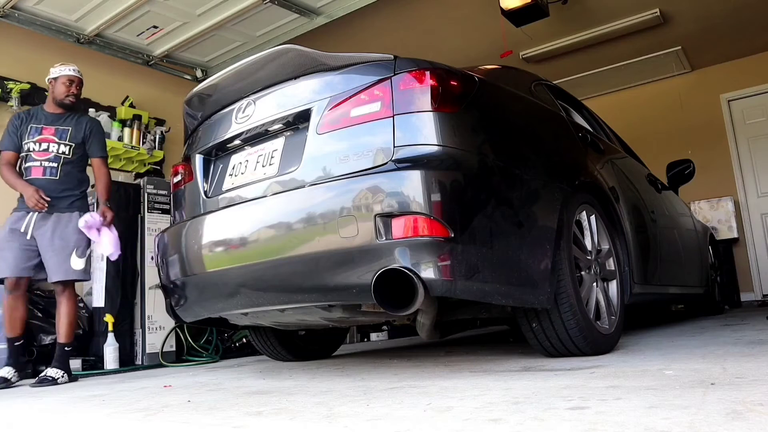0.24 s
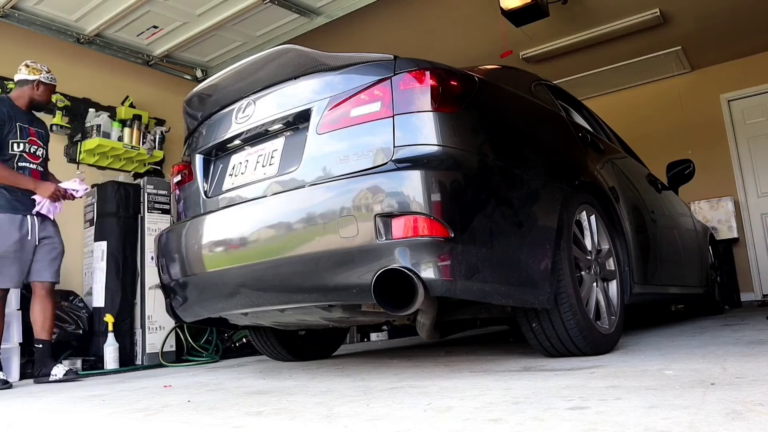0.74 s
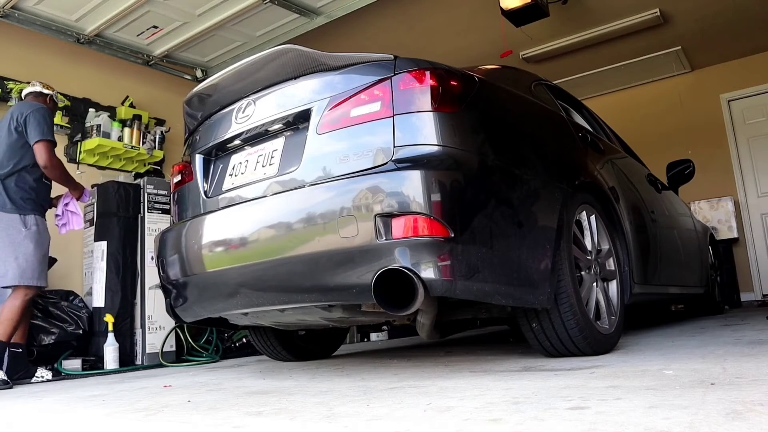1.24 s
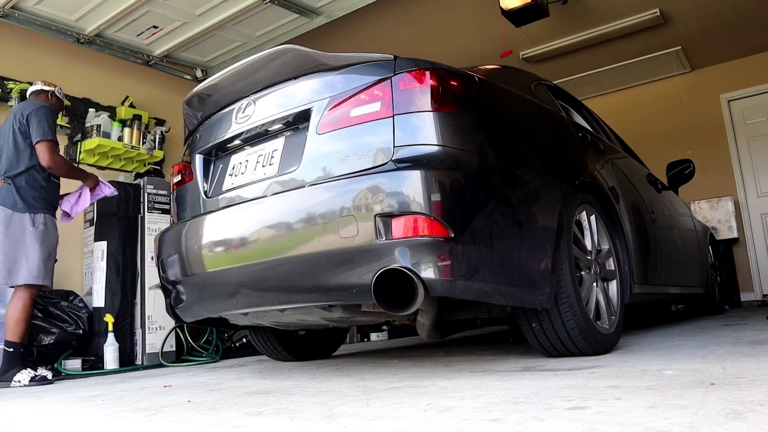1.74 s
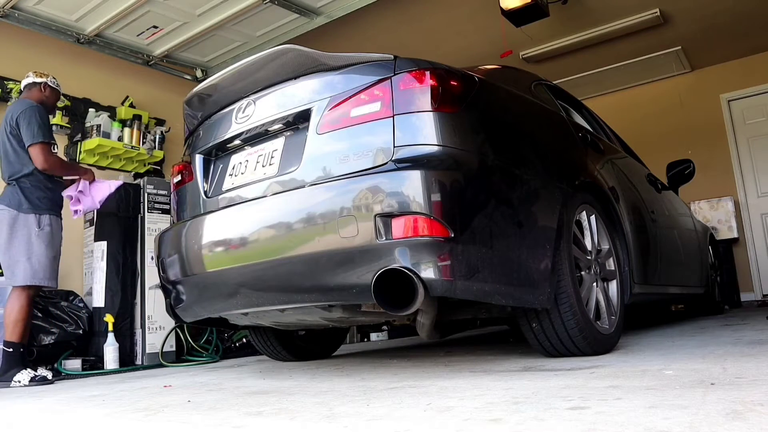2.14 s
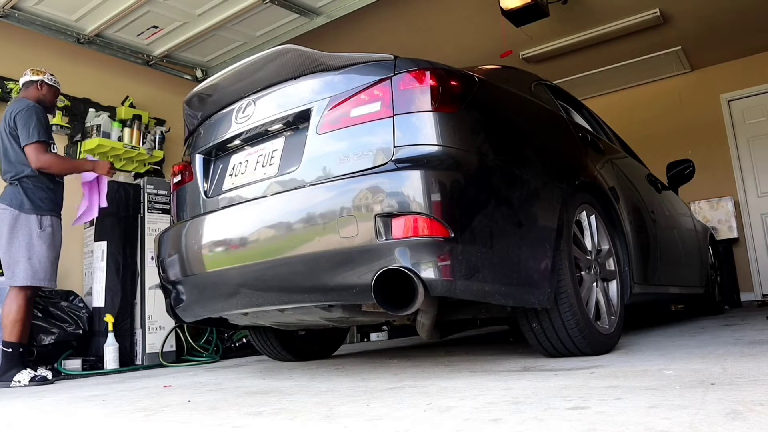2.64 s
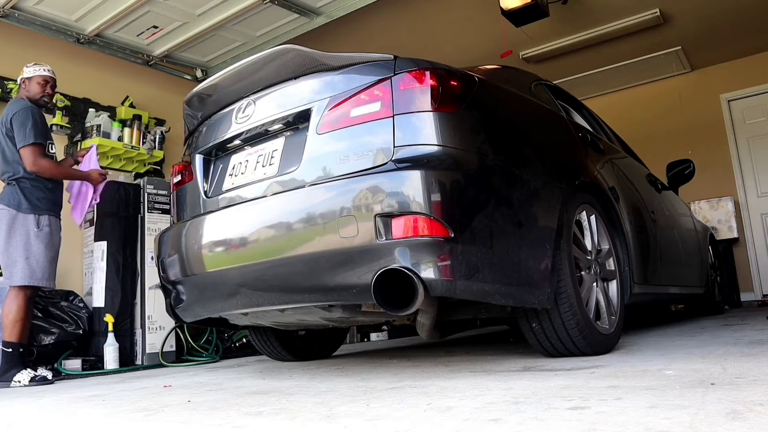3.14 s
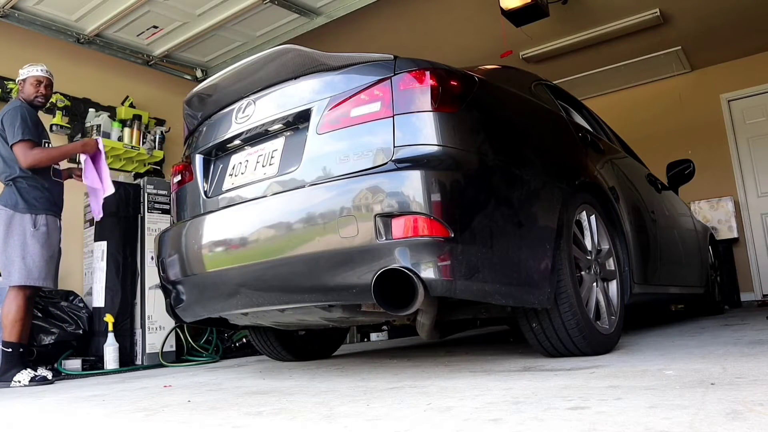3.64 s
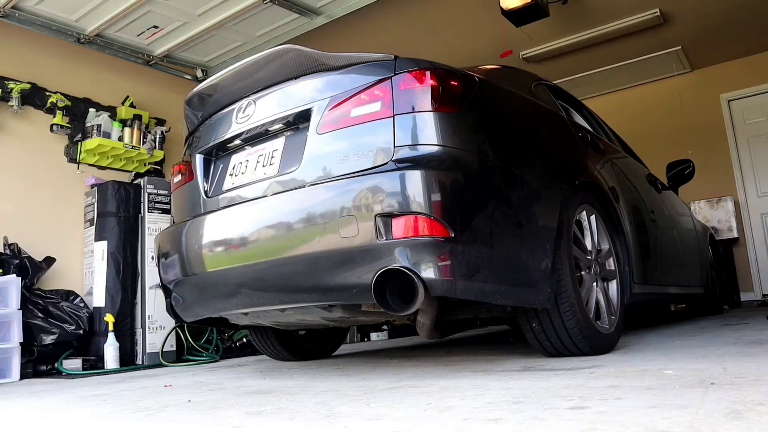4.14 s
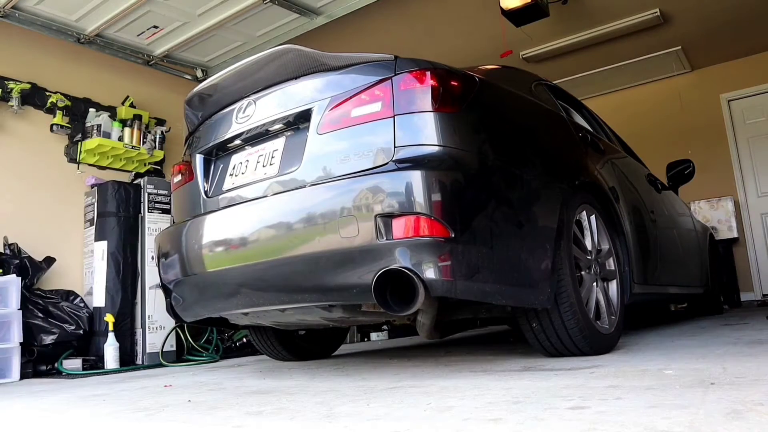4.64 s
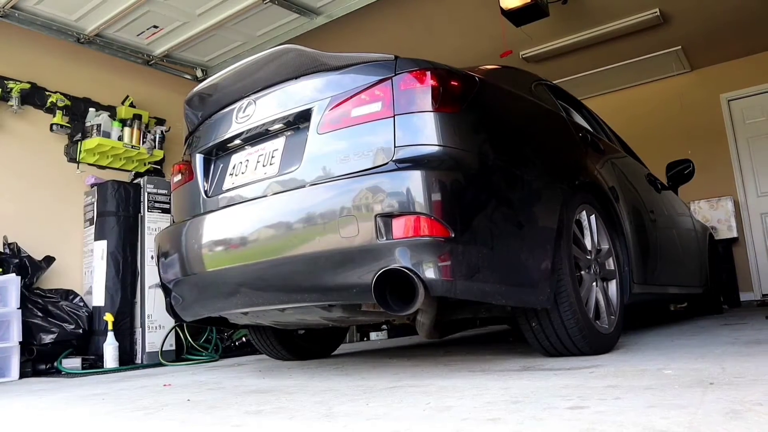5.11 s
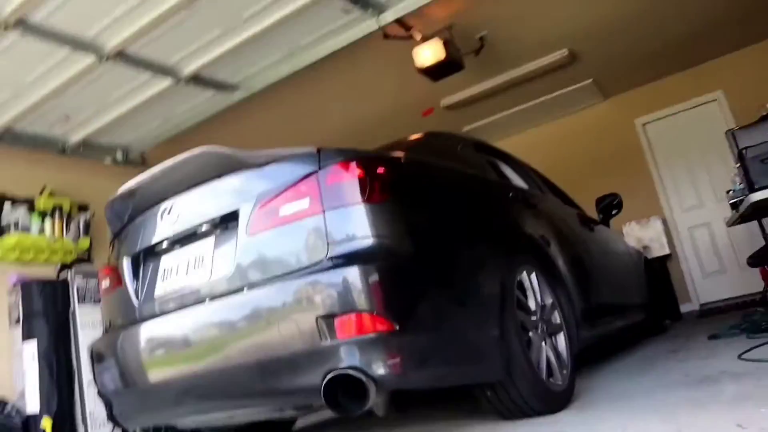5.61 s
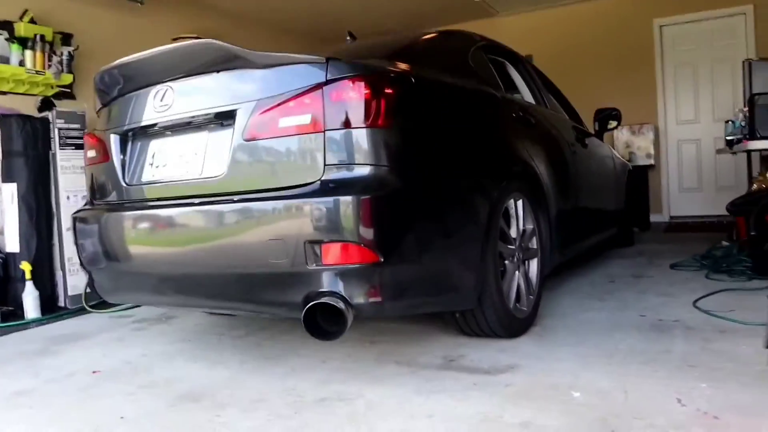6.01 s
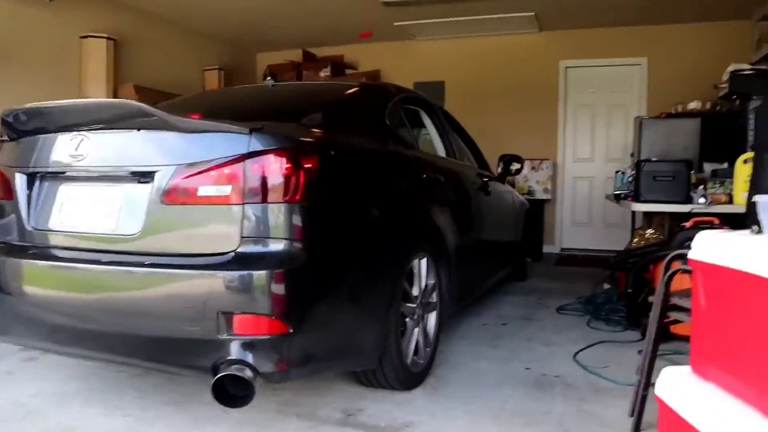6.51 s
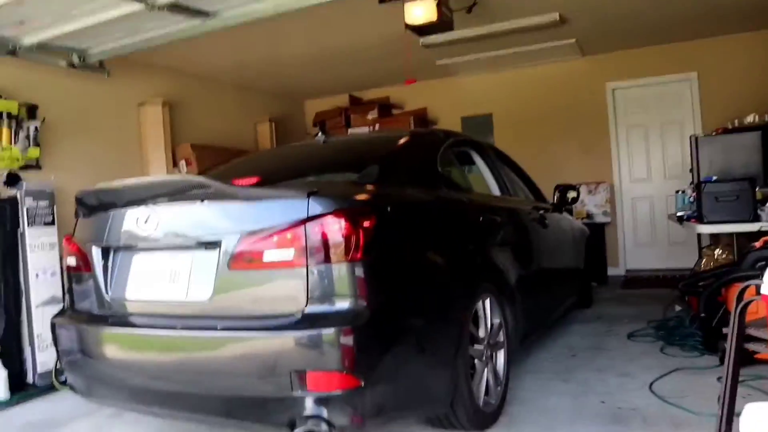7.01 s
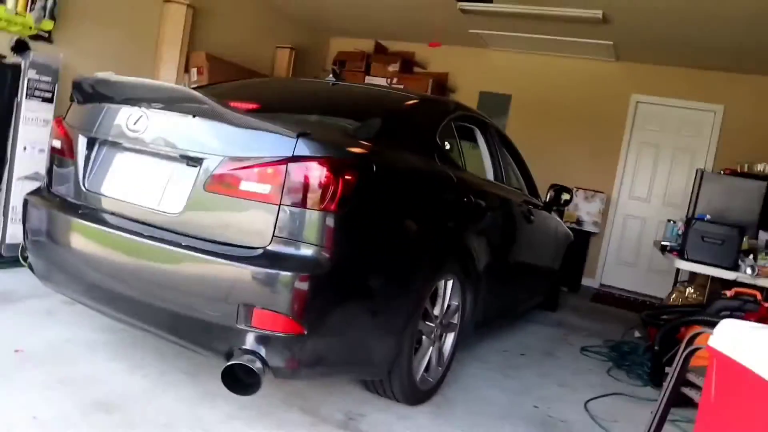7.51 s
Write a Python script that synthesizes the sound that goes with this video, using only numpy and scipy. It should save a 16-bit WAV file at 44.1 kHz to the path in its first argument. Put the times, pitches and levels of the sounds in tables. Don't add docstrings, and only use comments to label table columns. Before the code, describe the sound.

A car engine idles in a garage with a loud, lumpy exhaust drone and raspy gas puffs, cut briefly by silence, then continuing slightly lower.

```python
import sys
import numpy as np
from scipy import signal
from scipy.io import wavfile
from scipy.ndimage import uniform_filter1d

SR = 44100
rng = np.random.default_rng(int(sys.argv[2]) if len(sys.argv) > 2 else 0)


def gain_from_db(level_db):
    decades = np.asarray(level_db, float) / 20
    return 10 ** decades


def inscribe(sig):
    pcm = np.round(np.clip(np.atleast_2d(sig).T, -1, 1) * 32767)
    wavfile.write(sys.argv[1], SR, pcm.astype(np.int16))


N = 342216


def evened(x):
    return x / np.sqrt(np.mean(x ** 2) + 1e-20)


def curves(rows, t):
    s, *columns = np.transpose(rows)
    return [np.interp(t, s, column) for column in columns]


def read(points, hz):
    f, value = np.transpose(points)
    return np.interp(np.log(hz + 1), np.log(f + 1), value)


def resonate(x, hz, width):
    return signal.lfilter(*signal.iirpeak(hz, hz / width, SR), x)


# time_s, firing_rate_hz
SPEED_FIRST = [(0.0, 54.92), (0.25, 55.32), (1.28, 54.78), (1.81, 55.04), (2.27, 55.23), (2.49, 54.81),
               (3.99, 55.07), (4.2, 54.52)]
SPEED_SECOND = [(4.26, 53.71), (4.8, 53.0), (5.26, 53.34), (5.64, 54.39), (6.24, 53.74), (6.91, 53.78),
                (7.34, 53.36), (7.76, 53.51)]
FIRED = [9.104, 6.987]


def crank(t, k):
    speed = [SPEED_FIRST, SPEED_SECOND][k]
    turns = np.cumsum(curves(speed, t)[0]) / SR
    count = np.floor(FIRED[k] + turns - np.interp(speed[0][0], t, turns))
    at = np.flatnonzero(np.diff(count)) + 1
    cylinder = (count[at] % 6).astype(int)
    return at, cylinder, turns / 6


# time_s, change_db
ODD_FIRST = [(0.053, -12), (0.469, 7.5), (0.632, 2.5), (0.796, 5.1), (1.251, -2), (1.306, 8.5), (1.36, -5),
             (1.579, -4.6), (1.616, 2.5), (1.815, 4.5), (1.87, 3.5), (2.142, 2), (2.323, 5.5), (2.378, 3),
             (2.414, -27), (2.596, 2.5), (2.669, -10), (2.761, 6), (2.834, 5.0), (3.016, 7), (3.034, 3.8),
             (3.198, 8), (3.253, -4), (3.344, 6.5), (3.362, 4.0), (3.471, 5.5), (3.762, -2.5), (3.798, 4.3),
             (3.889, 5), (4.125, -9),
             (.162, 1.5), (.525, -4), (.561, -4), (.978, -3), (1.014, -2), (1.214, -1), (1.396, -3.5),
              (1.433, -4), (1.451, -3), (1.469, 3.5), (1.761, -1), (2.069, -4), (2.979, -3), (3.289, -5)]
ODD_SECOND = [(4.391, 2.5), (4.672, 4.5), (4.71, 2.5), (4.785, 2), (5.048, 2.5), (5.086, 3.5), (5.18, 2.8),
              (5.255, 5.0), (5.386, 4.5), (5.423, 7), (5.553, -1.5), (5.59, 5), (5.737, 2.5), (5.774, 3.2),
              (5.792, 2.5), (5.811, 3.5), (5.847, -4), (5.922, 5.5), (6.181, 4.5), (6.814, 4), (6.851, 4),
              (7.467, 4)]
# time_s, change_db
LAST_BURN = (8.4, 8.9)
SCATTER_DB = [1.53, 1.32]


def burns(firing_s, k):
    carry = 0.3
    odd_db = np.zeros(len(firing_s))
    for s, db in [ODD_FIRST, [*ODD_SECOND, LAST_BURN]][k]:
        odd_db[np.argmin(abs(firing_s - s))] += db
    chance_db = SCATTER_DB[k] * rng.standard_normal(len(firing_s)) * (odd_db == 0)
    return signal.lfilter([1], [1, -carry], odd_db) + chance_db


CYLINDER_DB = [
    [3.2, 0.93, -0.06, -3, -1.05, -2.65],
    [1.06, .1, 0.39, -1.46, -0.55, -2.1],
]
# time_s, mean_blow_db
EFFORT_FIRST = [(0.0, -10), (0.84, -10.9), (1.68, -9), (2.52, -8), (3.36, -12.5), (4.2, -9)]
EFFORT_SECOND = [(4.26, -9.5), (4.96, -7.5), (5.66, -12), (6.36, -11), (7.06, -9), (7.76, -8)]
PUFF_DB = [
    [(-10, -6.5, -6, -7, -13.5, -14), (-7, -8, -3, -8.5, -12, -11), (-9, -14, -16, -9.5, -8.5, -9.5),
     (-7, -9, -9, -3, -1, -8)],
    [(-9, -9.5, -11.5, -10.5, -10, -9.5), (-9.5, -4.5, -9, -16.5, -15, -9.5),
     (-9, -15.5, -13, -5, -10.5, -5), (-11, -10, -11, -8, -8, -15)],
]


def firings(t, k):
    at, cylinder, cycles = crank(t, k)
    burn_db = burns(t[at], k)
    effort_db = curves([EFFORT_FIRST, EFFORT_SECOND][k], t[at])[0]
    blows = np.zeros(len(t))
    puffs = np.zeros((len(PUFF_DB[k]), len(t)))
    blows[at] = gain_from_db(np.array(CYLINDER_DB[k])[cylinder] + effort_db + burn_db)
    puffs[:, at] = gain_from_db(np.array(PUFF_DB[k])[:, cylinder] + 0.75 * burn_db)
    return blows, puffs, cycles


# pitch_hz, level_db, t60_s, sign at the microphone
PIPE = [
    [(55.2, -30, 0.99, 1), (100, -21.5, 1, 1), (116, -10.5, 0.12, 1), (143.95, -10, 0.99, -1),
     (172.32, -4, 0.26, -1), (190.9, -2.5, 0.22, 1), (212, -39, 0.94, -1), (248.3, -14.5, 0.47, -1),
     (283.8, -11, 0.2, -1), (298.3, -10, 0.64, 1), (330.4, -38, 0.86, 1), (391.8, -38, 0.47, -1),
     (441, -30, 0.18, 1)],
    [(54.5, -42, 1, 1), (100.4, -13, 0.7, 1), (130, -4.5, 0.077, -1), (157.4, -26.5, 0.48, 1),
     (173.46, 1.8, 0.13, 1), (186.6, 0, 0.2, -1), (218.3, -49, 1, 1), (245, -16.5, 0.77, 1),
     (270.3, -27.5, 0.22, 1), (293.7, -15, 0.62, -1), (337.2, -17, 0.066, 1), (349.4, -20, 0.9, -1),
     (384.4, -31.5, 0.26, -1), (447, -59, 0.9, -1)],
]
PIPE_TOP_HZ = [470, 358]


def pipe(blows, dead, k):
    before, rise_s = 800, 0.0061
    t = np.arange(-before, 20000) / SR
    ring = np.zeros(len(t))
    for hz, db, t60, sign in PIPE[k]:
        decay = gain_from_db(db - 60 * np.maximum(t, 0) / t60)
        ring += np.sign(sign) * decay * np.cos(2 * np.pi * hz * t)
    ring = ring * np.exp(-(np.minimum(t, 0) / rise_s) ** 2)
    drone = signal.fftconvolve(blows, ring)[before:][:len(blows)]
    drone = signal.sosfiltfilt(signal.butter(6, PIPE_TOP_HZ[k], fs=SR, output="sos"), drone)
    upper = signal.sosfiltfilt(signal.butter(4, 293, "high", fs=SR, output="sos"), drone)
    return drone - 0.36 * dead * upper


CYCLE = [4810, 4930]


def cyclic(noise, cycles, k, share):
    cycle = CYCLE[k]
    lead_shape = noise.shape[:-1]
    rows = noise[..., :noise.shape[-1] // cycle * cycle].reshape(*lead_shape, -1, cycle)
    rows = signal.lfilter([np.sqrt(1 - share ** 2)], [1, -share], rows, axis=-2)
    noise = rows.reshape(*lead_shape, -1)
    place = ((cycles - cycles[0]) * cycle).astype(int)
    return noise[..., np.minimum(place, noise.shape[-1] - 1)]


def rasp(puffs, colour, late_s, turbulence, steady=.08):
    puff_s = .0025
    t = np.arange(2000) / SR - late_s
    puff = np.exp(-np.maximum(t, 0) / puff_s) * (t > 0)
    flow = signal.fftconvolve(puffs, puff)[:len(puffs)] + steady
    flow = flow / np.sqrt(uniform_filter1d(flow ** 2, size=12000))
    gas = flow * turbulence
    sound = np.zeros(len(gas))
    for i, (hz, width, db) in enumerate(colour):
        mode = resonate(resonate(gas, hz, width), hz, 3 * width)
        sound += (-1) ** i * gain_from_db(db) / np.sqrt(width) * mode
    return evened(sound)


# pitch_hz, width_hz, level_db
OUTLET = [
    [[(55, 10, -16), (105, 16, -10), (165, 14, -5), (228, 22, -1), (277, 18, -1), (339, 14, -2)],
     [(391, 16, 0), (440, 14, -1), (490, 25, -6)], [(550, 45, 0), (615, 28, -1), (690, 40, -5),
     (765, 40, -8), (830, 35, -9), (906, 28, -11), (995, 35, -11), (1080, 40, -14)], [(1250, 120, 0),
     (1460, 60, -1)]],
    [[(56, 14, -9), (107, 12, -10), (160, 14, -7), (218, 22, -3), (295, 36, .1), (345, 16, -3)],
     [(397, 16, 0), (447, 22, 0), (500, 25, -3), (550, 30, -5)], [(620, 30, 0), (708, 17, -1),
     (780, 30, -9), (900, 70, -14), (1000, 40, -13), (1085, 25, -14)], [(1400, 90, 0), (1600, 120, -2),
     (1820, 130, -2)]],
]
LATE_S = [(.0195, .016, .0195, .0195), (.0195, .0195, .0245, .023)]


def outlet(puffs, rasps_db, cycles, k):
    noise = rng.standard_normal((2, len(cycles) + 2 * CYCLE[k]))
    direct, thrown = cyclic(noise, cycles, k, .4)
    layers = list(zip(rasps_db, puffs, OUTLET[k], LATE_S[k]))
    gas = sum(gain_from_db(db) * rasp(*layer, direct) for db, *layer in layers)
    walls = sum(gain_from_db(db - 14) * rasp(*layer, thrown, steady=.2) for db, *layer in layers[1:])
    return gas, walls


# pitch_hz, density in dB per Hz
HISS = [
    [(500, 4.5), (1300, -1), (1700, -2.5), (2100, -5.5), (2600, -4), (3300, -6), (4000, -6.5), (5000, -11),
     (6300, -13.5), (7800, -15.5), (9000, -18), (10200, -16), (11500, -14), (12900, -16)],
    [(500, -3), (1300, 0), (1700, -4), (2100, -5.5), (2600, -5.5), (3300, -8.5), (4000, -10), (5000, -11.5),
     (6300, -15), (7800, -16.5), (9000, -19), (10200, -17), (11500, -15), (12900, -18)],
]
# pitch_hz, side minus mid level_db
HISS_SIDE = [(300, -36), (660, -7.5), (1190, -3), (2170, 0.5), (3940, 1), (7170, 5.5), (13000, 4.5)]
# pitch_hz, share of the side that follows the mid
HISS_LINK = [(500, .45), (1200, .45), (2300, .45), (4500, .25), (9000, .05)]


def hiss(size, k):
    port_turn = -1.87
    patchy_db = 1.0
    frames, hz = size // 128 + 5, np.fft.rfftfreq(512, 1 / SR)
    re, im, patches = rng.standard_normal((frames, 257, 2, 3)).T
    patches = uniform_filter1d(patches[0], size=40, axis=1)
    patches = evened(uniform_filter1d(patches, size=5, axis=0))
    colour_db = read(HISS[k], hz) + np.array([0 * hz, read(HISS_SIDE, hz)])
    mid, side = re + 1j * im
    link = np.clip(read(HISS_LINK, hz), 0, 1)[:, None]
    side = np.sqrt(1 - link ** 2) * side + link * np.exp(1j * port_turn) * mid
    z = np.array([mid, side]) * gain_from_db(colour_db[:, :, None] + patchy_db * patches)
    noise = signal.istft(z, nperseg=512, noverlap=384)[1][:, :size]
    return noise / np.diff(noise[0]).std()


# pitch_hz, width_hz, level over the hiss in dB
WHINE = [
    [(2295, 18, -8.5), (4575, 25, -16), (3870, 120, -12), (1460, 20, -13)],
    [(2222, 18, -10), (4445, 30, -17), (1085, 20, -15)],
]


def whine(size, k):
    tones = sum(gain_from_db(db) * evened(resonate(rng.standard_normal(size), hz, width)) for hz, width, db in WHINE[k])
    return tones * np.array([[1], [-.8]])


def engine_bay(bay_db, cycles, k):
    noise = hiss(len(cycles) + 2 * CYCLE[k], k)
    return (gain_from_db(4.0) * cyclic(noise, cycles, k, .25) + whine(len(cycles), k)) * gain_from_db(bay_db)


# time_s, height 0-1, facing the outlet 0-1
MICROPHONE = [
    (0, 0.28, 0),
    (5.2, 0, 0.51),
    (5.7, 0.24, 0),
    (5.95, 0.3, 0.66),
    (6.25, 0.5, .7),
    (6.5, 0.84, 0.87),
    (7.3, 0.86, 0.3),
    (7.76, 0.87, .7),
]
RASP_DB = [(-25.5, -32.5, -35.5, -56), (-28, -36.5, -38.5, -60)]
BAY_DB = [-49, -51.5]
HEIGHT_DB = (1.5, -9, -2, 2, -2)
FACING_DB = (-2.5, 3.5, -1, 11.5, 2)
DEAD_DB = (-13, -2, 1.5, -1.5, 1)
# middle_s, length_s, level_db
SURGES = [(.27, 0.073, 0), (0.477, 0.16, -3), (.7, 0.86, 2), (1.817, 0.06, 5.5), (2.3, .6, 3),
          (3.482, 0.039, 5.5), (3.897, .09, 3), (4.35, 0.13, -3), (4.683, 0.11, 8), (5.048, 0.58, 2),
          (5.884, 0.067, 5), (7.702, 0.37, 3.5)]


def levels(t, k):
    dead_s, dead_length_s = 6.6, .45
    flutter_db, flutter_s = 1.0, .03
    height, facing = curves(MICROPHONE, t)
    dead = np.exp(-(2 * (t - dead_s) / dead_length_s) ** 4)
    changes = zip([*RASP_DB[k], BAY_DB[k]], HEIGHT_DB, FACING_DB, DEAD_DB)
    *rasps_db, bay_db = [db + up * height + on * facing + lost * dead for db, up, on, lost in changes]
    surge_db = sum(db * np.exp(-(2 * (t - s) / length) ** 2) for s, length, db in SURGES)
    flutter = evened(uniform_filter1d(rng.standard_normal(len(t)), round(flutter_s * SR)))
    return rasps_db, bay_db + surge_db + flutter_db * flutter, dead


def ports(exhaust, walls, bay):
    slope = -.8 * np.gradient(exhaust)
    both = np.array([exhaust, slope + walls]) + bay
    return signal.sosfilt(signal.butter(2, 25, "high", fs=SR, output="sos"), both)


def view(start, end, k):
    lead = 16000
    t = start + np.arange(-lead, round((end - start) * SR)) / SR
    blows, puffs, cycles = firings(t, k)
    rasps_db, bay_db, dead = levels(t, k)
    gas, walls = outlet(puffs, rasps_db, cycles, k)
    exhaust = pipe(blows, dead, k) + gas
    return ports(exhaust, walls, engine_bay(bay_db, cycles, k))[:, lead:]


# start_s, end_s
VIEWS = [
    (0, 4.198),
    (4.261, 7.76),
]


def scene():
    mid_side = np.zeros((2, N))
    for k, (start, end) in enumerate(VIEWS):
        first = round(start * SR)
        part = view(start, end, k)[:, :N - first]
        fade = np.minimum(np.arange(part.shape[1]) / 60, 1)
        mid_side[:, first:][:, :part.shape[1]] = part * (fade if k else fade[::-1])
    mid, side = mid_side
    return np.array([mid + side, mid - side])


def roll_off(x):
    return signal.sosfilt(signal.butter(12, 13630, fs=SR, output="sos"), x)


def record(dry):
    limited = signal.oaconvolve(dry, signal.firwin(401, 13280, fs=SR)[None], "same")
    return roll_off(limited)


dry = scene()
out = record(dry)
inscribe(out)
```